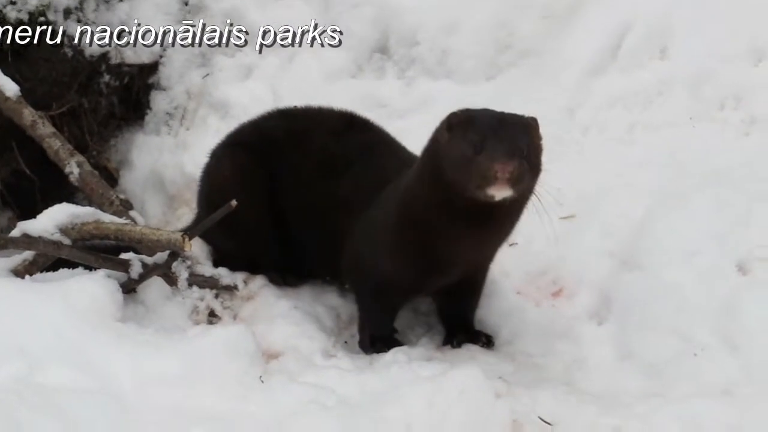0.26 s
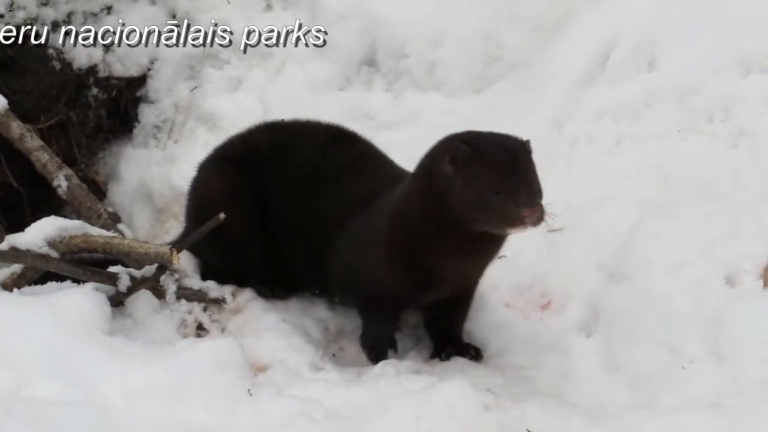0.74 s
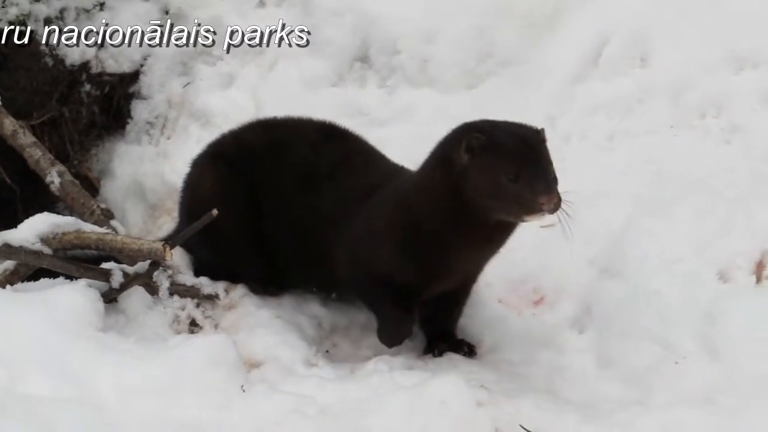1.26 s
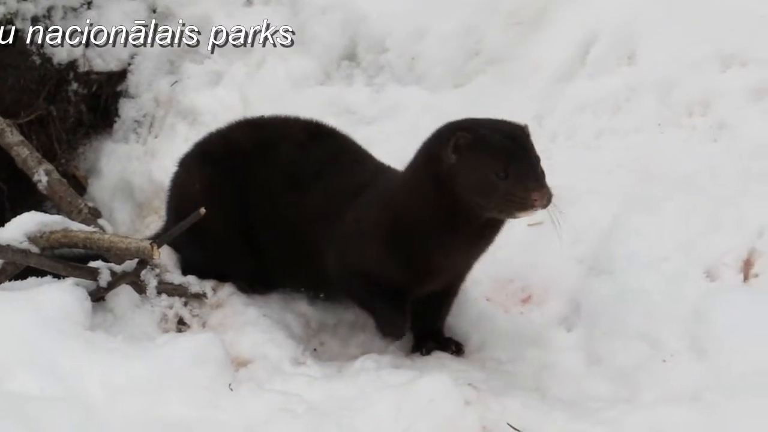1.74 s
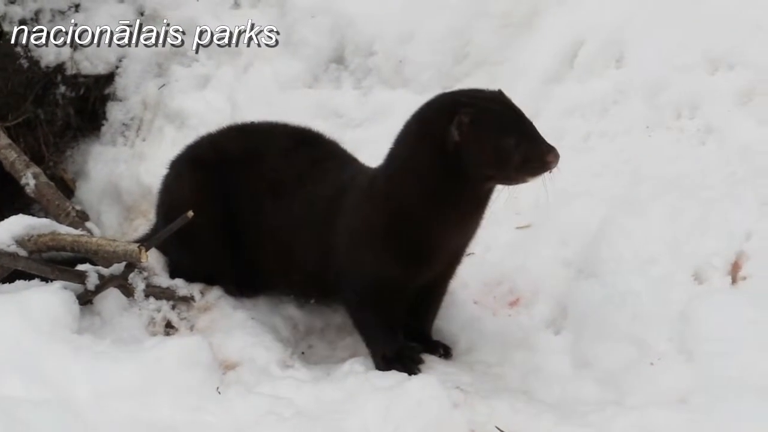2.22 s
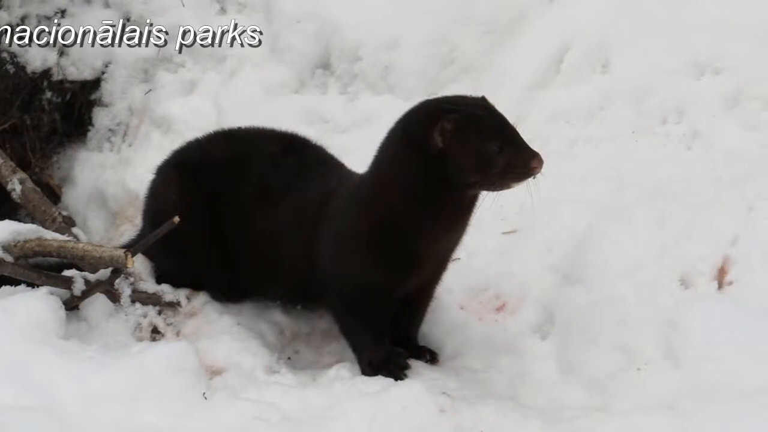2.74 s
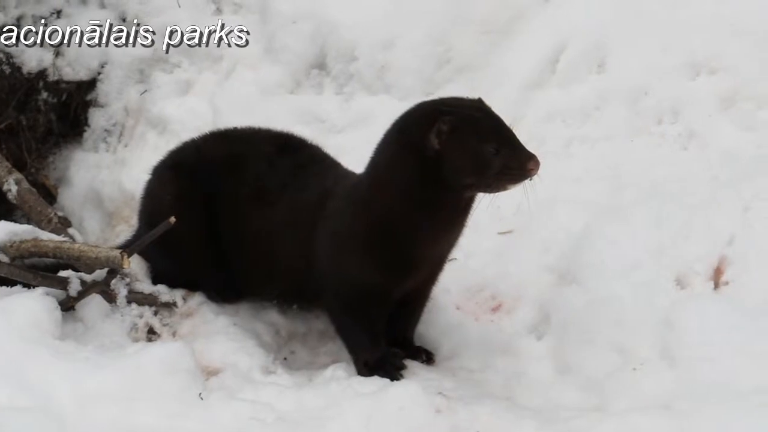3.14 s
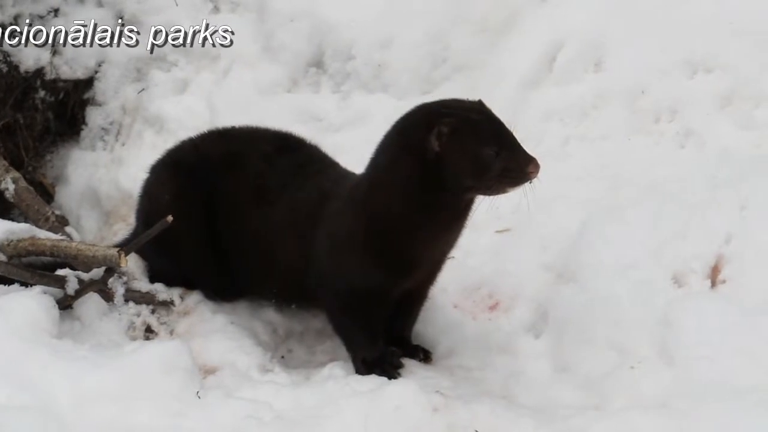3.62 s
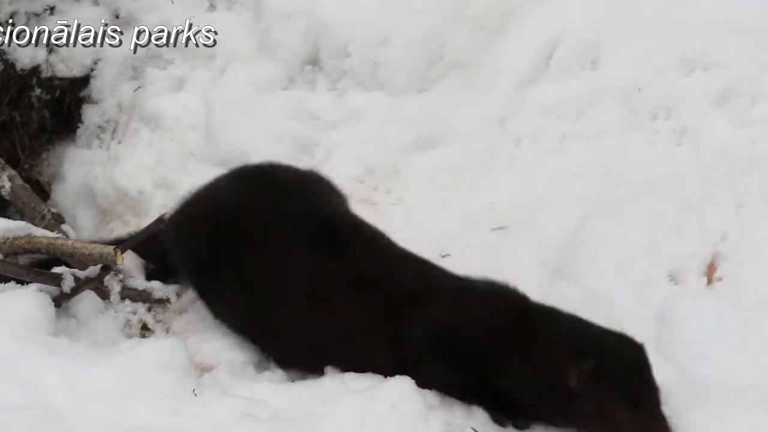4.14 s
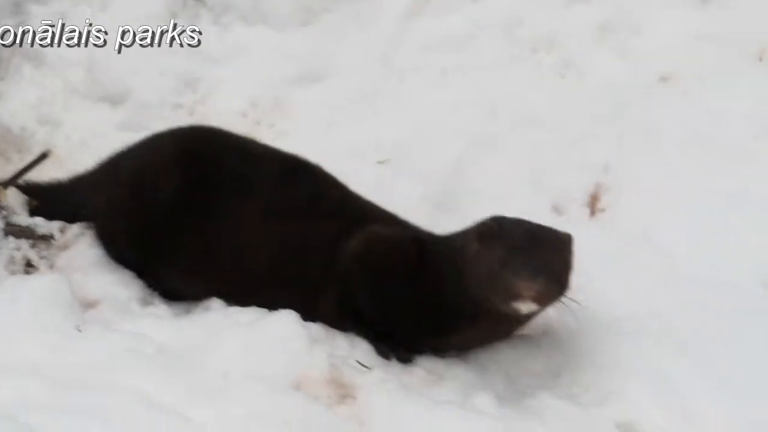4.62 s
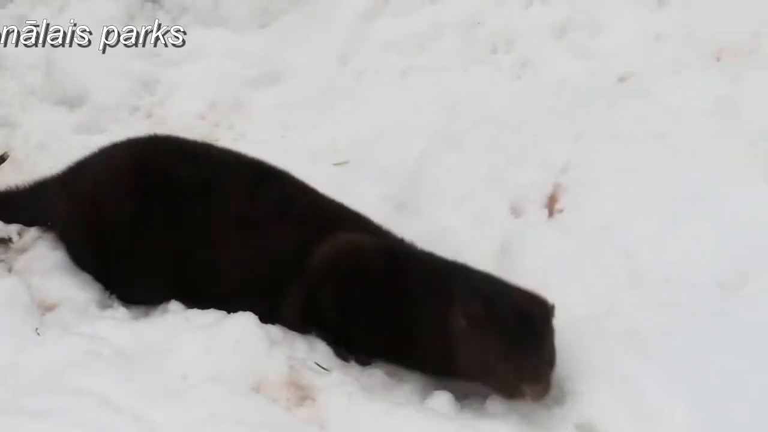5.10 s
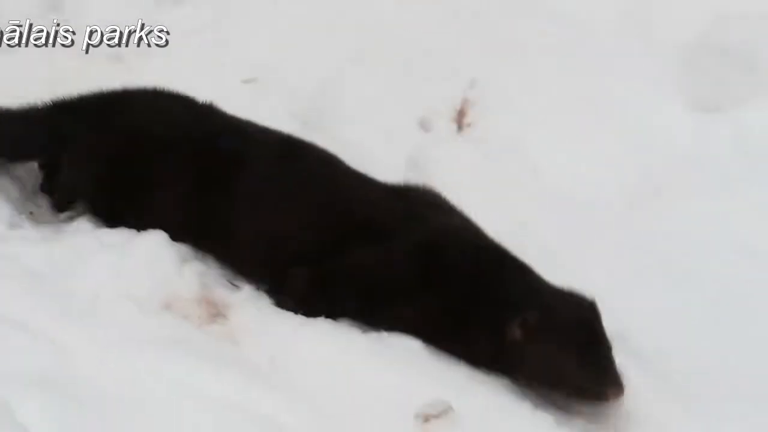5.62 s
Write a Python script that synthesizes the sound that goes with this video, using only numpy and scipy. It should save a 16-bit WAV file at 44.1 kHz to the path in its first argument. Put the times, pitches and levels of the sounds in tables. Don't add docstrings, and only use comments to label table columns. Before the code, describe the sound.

Quiet winter outdoors, hand-held microphones close to a small animal. Sparse dry clicks of breaking snow crust come first, the second snap strongest and toward the right. Then mostly hiss, low wind buffeting, faint ticks and distant high bird chirps. Near the end, three tight clusters of bright crackling crunches burst out, spread left and right, with grainy grinding and gentle brushing.

```python
import sys
import numpy as np
from scipy import signal
from scipy.io import wavfile

SR = 44100
rng = np.random.default_rng(int(sys.argv[2]) if len(sys.argv) > 2 else 0)


def gain_from_db(level_db):
    decades = np.asarray(level_db, float) / 20
    return 10 ** decades


def transcribe(signal):
    frames = np.atleast_2d(signal).T
    limited = np.clip(frames, -1, 1)
    pcm = np.round(limited * 32767).astype(np.int16)
    wavfile.write(sys.argv[1], SR, pcm)


N = 258426
CLICK_SAMPLES = 3500


def rms_one(x):
    return x / np.sqrt(np.mean(x ** 2) + 1e-20)


def in_time(rows):
    s, *columns = np.transpose(rows)
    return [np.interp(np.arange(N) / SR, s, c) for c in columns]


def at_hz(points, hz):
    points = np.array(points)
    return np.interp(np.log(hz), np.log(points[:, 0]), points[:, 1])


def drift(rate_hz, size=N):
    r = np.exp(-2 * np.pi * rate_hz / SR)
    noise = rng.standard_normal(size + SR)
    return rms_one(signal.lfilter([1], [1, -2 * r, r * r], noise)[SR:])


def ring(clicks, hz, t60_s):
    r, w = gain_from_db(-60 / (t60_s * SR)), 2 * np.pi * hz / SR
    return signal.lfilter([0, np.sin(w)], [1, -2 * r * np.cos(w), r * r], clicks + 1e-18)


def body(clicks, modes, tilts_db, scatter_db):
    chance = rng.standard_normal(len(modes))
    octaves = np.log2(np.array(modes)[:, 0] / 3000)
    bright_db, weight_db = tilts_db
    colour_db = np.where(octaves > 0, bright_db, -weight_db) * octaves + scatter_db * chance
    rings = 0
    for k, (hz, t60_s, db) in enumerate(modes):
        rings = rings + (-1) ** k * gain_from_db(db + colour_db[k]) * ring(clicks, hz, t60_s)
    snow = signal.butter(3, [213.6, 9600], "band", fs=SR, output="sos")
    return signal.sosfilt(snow, rings)


def crumble(decay_ms, per_s):
    t = np.arange(CLICK_SAMPLES) / SR
    sizes = gain_from_db(3.365 * np.minimum(rng.exponential(1, CLICK_SAMPLES), 4))
    sizes = sizes * rng.choice([-1, 1], CLICK_SAMPLES)
    struck = rng.random(CLICK_SAMPLES) < per_s / SR
    grains = sizes * struck * np.exp(-t * 1000 / max(decay_ms, .2))
    grains[0] = 2.36
    return grains


def add(out, sound, s, db, pan_db=0.):
    sound = sound / np.sqrt(np.sum(sound ** 2, axis=1, keepdims=True))
    sound = sound * gain_from_db([[pan_db / 2], [-pan_db / 2]])
    peak = np.sqrt(np.max(np.mean(sound ** 2, axis=0)))
    at = round(s * SR)
    out[:, at:at + CLICK_SAMPLES] += gain_from_db(db) * (sound / peak)[:, :N - at]


# f/Hz, t60/s, snap level/dB, crunch level/dB
LEFT_MODES = [(318, 0.00555, -63, -15), (605, 0.031, -23, -17.5), (1039, 0.0114, -45.5, -16),
              (1274, 0.021, -9.5, -13.5), (1748, 0.0235, -16.5, -15.5), (2162, 0.0207, -13, -9.5),
              (2528, 0.0106, -5.5, -6), (3157, 0.0109, -6, -2), (3479, 0.00456, -18.5, 4),
              (4001, 0.00433, -6, -1), (4545, 0.00388, -17, 1.5), (5300, 0.00352, -56, -8),
              (5480, 0.0056, -35, -30), (6200, 0.0057, -36.5, -57), (8040, 0.0042, -35.5, -56)]
# f/Hz, t60/s, snap level/dB, crunch level/dB
RIGHT_MODES = [(349, 0.00607, -36, -12), (605.6, 0.0445, -24, -19.5), (966.6, 0.0225, -12, -8.5),
               (1326.4, 0.00903, -3.5, -4.5), (1965, 0.0195, -13.5, -13), (2409, 0.021, -8, -16),
               (2917.6, 0.00928, -2.5, -1), (3382, 0.0088, -3.5, -16.5), (4074, 0.00316, 1.5, -2),
               (4663, 0.00427, 2, -4.5), (5317, 0.00486, -2, -6), (5834, 0.0048, 0, -3),
               (6800, 0.00198, -1, -1), (8196, 0.00352, -15, -6.5), (8985, 0.00201, -19, -10)]
# t/s, peak/dB, left-right/dB, brightness/(dB/octave), weight/(dB/octave)
SNAPS = [
    (0.5202, -19, -6, 5.5, 0.5),
    (1.827, -11.5, -6.5, -2.5, -3.5),
    (4.5283, -25.5, -2, -4, 1),
    (5.3424, -12, -8.5, -1.5, -4),
    (5.5507, -20.5, -6, 2, 2),
    (5.597, -12.5, -8, -3.5, -2.5),
]


def snaps():
    out, ms = np.zeros((2, N)), SR / 1000
    left, right = np.array(LEFT_MODES)[:, [0, 1, 2]], np.array(RIGHT_MODES)[:, [0, 1, 2]]
    paths = np.zeros(round(4 * ms))
    paths[np.round(np.array([.2, .55, .85, 2.6]) * ms).astype(int)] = [1.0, 0.48, 0.626, 0.069]
    breaks_at = np.round(np.array([0, .14, .62]) * ms).astype(int)
    for s, db, pan_db, *tilts_db in SNAPS:
        near = np.zeros(CLICK_SAMPLES)
        near[breaks_at] = [-.4, 1, .4] * gain_from_db(rng.normal(0, 0.46, 3))
        far = np.convolve(near, paths)[:CLICK_SAMPLES] + gain_from_db(-22) * crumble(3.37, per_s=10000)
        near = near + gain_from_db(-20) * crumble(1.0, per_s=8000)
        sides = [body(far, left, tilts_db, scatter_db=0.0), body(near, right, tilts_db, scatter_db=1.5)]
        add(out, np.array(sides), s - .0003, db + 3.5, pan_db)
    no_thud = signal.butter(2, 432, "high", fs=SR, output="sos")
    return signal.sosfilt(no_thud, out)


# t/s, peak/dB, left-right/dB, brightness/(dB/octave), weight/(dB/octave)
CRUNCHES = [(1.221, -28.5, 1.5, 7.5, 3.5), (4.399, -35, -12.5, 5.5, 4), (4.402, -17, 10, 7, -8.5),
            (4.437, -17.5, 5, 12.5, 2.5), (4.4539, -30, -20.5, 5.5, -4), (4.495, -36, 4.5, -7.5, 7),
            (4.562, -27.5, -6, -4.5, 0.5), (4.5757, -28, 8, -2, -0.42), (4.582, -16.5, 2, 7.5, 0.5),
            (4.59, -26, -15, 3.5, -0.5), (4.602, -36, -2.5, 7, 6.5), (4.65, -15.5, 6, 5, 0),
            (5.3326, -25, 2.5, -2, -0.2), (5.367, -20.5, 1.5, 5, -0.02), (5.384, -28, -1, -9, 0.5),
            (5.584, -24.5, 3, -2, 3), (5.589, -30, -6, -2.5, -2), (5.6075, -13.5, 1.5, 2.5, -1.03),
            (5.613, -25.5, 0.5, -1.5, 2.5), (5.78, -37.5, -0.5, -8.5, 4.5), (5.789, -17.5, 0.5, 4, -0.5),
            (5.796, -28, 12.5, -5.5, 3.5), (5.8, -28, -1.5, 1.5, -2.5)]


def crunches():
    out, crumble_ms = np.zeros((2, N)), 1.404
    left, right = np.array(LEFT_MODES)[:, [0, 1, 3]], np.array(RIGHT_MODES)[:, [0, 1, 3]]
    for s, db, pan_db, *tilts_db in CRUNCHES:
        near = crumble(crumble_ms, per_s=3000)
        other = crumble(0.86 * crumble_ms, per_s=4100)
        far = np.r_[np.zeros(8), near + .7 * other][:CLICK_SAMPLES]
        sides = [body(near, left, tilts_db, scatter_db=1.5), body(far, right, tilts_db, scatter_db=0.0)]
        add(out, np.array(sides), s + 0.00074, db - 5.0, pan_db)
    return out


# t/s, peak/dB, left-right/dB, brightness/(dB/octave), weight/(dB/octave)
CRACKS = [(.5224, -32.5, 7.5, 6, 0), (4.4002, -35, 6, 6.5, 5.5), (4.4357, -40, 10, -0.5, 6),
          (4.441, -32, 5, 2.5, 1), (4.4452, -40.5, 5.5, -2.5, -3.5), (4.4522, -41.5, 0, 2.5, -4.5),
          (4.4554, -33.5, -19, 4.5, 0.5), (4.5639, -34, -14, 0.5, 3), (4.5763, -28, 10, -3, 2),
          (4.5852, -30, -1, -3.5, 2), (4.6533, -31, 2.5, -2, 0), (4.656, -44.5, 10, -2.5, -1.5),
          (5.3335, -25, -0.5, 0.5, -1), (5.3475, -34.5, 6, -2, 0), (5.3679, -25.5, 5, 5, 0),
          (5.374, -36, 9.5, -1, 2.5), (5.5526, -39, -0.5, -3, 2), (5.584, -37, 5, 0, 4),
          (5.5965, -33, -6, -3.5, 1), (5.6102, -29, 6, 2, 0), (5.6113, -31.5, 6, 4, 0),
          (5.6124, -32.5, 7.5, 0, 5), (5.6173, -36, 10.5, -2.5, 3.5), (5.7874, -35, 3, -4, 0),
          (5.7898, -24.5, 5, 2.5, -1), (5.7921, -26, -1, 2.5, 1), (5.793, -34, 0.5, 0, -3),
          (5.7958, -36, 6, 0, -3), (5.801, -25.5, -5, -0.5, -4)]


def cracks():
    out = np.zeros((2, N))
    left, right = np.array(LEFT_MODES)[:, [0, 1, 3]], np.array(RIGHT_MODES)[:, [0, 1, 3]]
    click = np.eye(1, CLICK_SAMPLES)[0]
    late = np.roll(click, 4)
    for s, db, pan_db, *tilts_db in CRACKS:
        sides = [body(click, left, tilts_db, scatter_db=2.0), body(late, right, tilts_db, scatter_db=3.5)]
        add(out, np.array(sides), s - .0003, db - 0.5, pan_db)
    return out


# t/s, f/Hz, peak/dB, t60/s
KNOCKS = [(.5203, 1200, -33, 0.0091), (.5204, 1400, -44.5, 0.0062), (.521, 3600, -31, 0.0071),
          (1.8272, 1946, -28.5, 0.0143), (1.8272, 5680, -26.5, 0.0046), (1.222, 3980, -42.5, 0.0062),
          (.5204, 7240, -33, 0.0054), (.5204, 930, -44.5, 0.0085), (1.8272, 898, -38, 0.0103),
          (4.5288, 4350, -34, 0.0052), (4.5638, 2920, -39.5, 0.0066), (5.3336, 7360, -37.5, .004),
          (5.7898, 4600, -26, 0.0067), (4.4556, 6100, -37.5, .006), (4.4025, 990, -40, 0.0128),
          (4.439, 684, -49.5, 0.0185), (5.792, 2050, -35.5, 0.0104), (0.5211, 2570, -32.5, 0.0175),
          (0.522, 3180, -37.5, 0.009), (1.2225, 960, -46, 0.0266), (1.8285, 635, -43, 0.037),
          (3.03, 2180, -52, 0.0084), (4.6512, 423, -56, 0.0194)]


def knocks():
    out = np.zeros((2, N))
    bump = np.r_[np.hanning(18), np.zeros(CLICK_SAMPLES - 17)]
    push = np.diff(bump, 2, prepend=0)
    for s, hz, db, t60_s in KNOCKS:
        knock = ring(push, hz, t60_s)
        add(out, np.array([knock, knock]), s, db, pan_db=1.0)
    return out


# t/s, length/s, peak/dB, left-right/dB, brightness/(dB/octave)
GRINDS = [(1.227, 0.0081, -47, 0.5, -8.5), (4.407, 0.0117, -47.5, 2.5, 0), (4.443, 0.021, -40, -6, 3.5),
          (4.59, 0.033, -41, -2, 1.5), (4.6511, 0.0162, -39.5, -7, -1), (5.342, 0.0128, -35.5, 3, -19.5),
          (5.3685, 0.0436, -45, 4.5, -19.5), (5.583, 0.0672, -39, -3.5, 3), (5.7847, 0.031, -40, -3, -3.5)]


def grinds():
    out, weight_db = np.zeros((2, N)), 4
    t = np.arange(CLICK_SAMPLES) / SR
    for s, length_s, db, pan_db, bright_db in GRINDS:
        swell = np.sin(np.pi * np.clip(t / length_s, 0, 1) ** 0.688)
        sides = []
        for modes in (LEFT_MODES, RIGHT_MODES):
            grains = swell * crumble(60, per_s=5000)
            sides.append(body(grains, np.array(modes)[:, [0, 1, 3]], [bright_db, weight_db], scatter_db=3.5))
        add(out, np.array(sides), s, db, pan_db)
    return out


# f/Hz, t60/s, level/dB
TICK_MODES = [(341.5, 0.0238, -7.5), (650.5, 0.0354, -1), (1021, 0.0238, 2), (1434, 0.007, 3.5),
              (1998, 0.018, -2), (2862, 0.011, 0), (3886, 0.0063, -4.5)]
# t/s, peak/dB, tilt/(dB/octave)
TICKS = [(0.104, -43.5, 1.5), (1.374, -43.5, 1.5), (1.742, -44, 2), (2.069, -51, -3.5), (2.663, -43.5, 0),
         (3.029, -44.5, -1.5), (3.483, -43, 0), (3.61, -43, -4), (4.215, -44.5, -1.35), (4.788, -52, 1.5),
         (4.844, -57.5, -2.24), (4.948, -46, -16.5), (4.998, -45.5, -2.5), (5.158, -47.5, 0),
         (5.181, -48.5, 1.4), (5.204, -49, 3), (5.245, -50, -2.5), (5.42, -44, 0.56), (5.466, -45, -1),
         (5.496, -41.5, -2.5), (5.65, -43.5, -7)]


def ticks():
    out = np.zeros((2, N))
    for s, db, tilt_db in TICKS:
        tick = body(crumble(1.0, per_s=4700), TICK_MODES, [tilt_db, -tilt_db], scatter_db=0.5)
        add(out, np.array([tick, tick]), s, db - 3.0)
    return out


# t/s, level/dB
BRUSH = [(0.0, -69.5), (3.57, -67.5), (4.32, -64), (4.47, -63.5), (5.19, -64), (5.37, -61.5), (5.52, -60.5),
         (5.63, -61.5), (5.86, -61)]
# f/Hz, width/Hz, level/dB
BRUSH_MODES = [(411, 132, -6), (641.6, 98, -1.5), (896.2, 86, 0), (1176, 97.5, 1)]


def brushing():
    brush_db, = in_time(BRUSH)
    grains = rng.standard_normal((2, N)) * gain_from_db(2.25 * drift(69))
    grains[1] = .5 * grains[0] + 1.435 * grains[1]
    hollow = 0
    for k, (hz, width_hz, db) in enumerate(BRUSH_MODES):
        hollow = hollow + (-1) ** k * gain_from_db(db) * rms_one(ring(grains, hz, 2.37 / width_hz))
    return gain_from_db(brush_db - 3) * rms_one(hollow)


def whistle(hz, level, rough):
    size = len(hz)
    wobbled_hz = hz * (1 + 0.011 * rough * drift(150, size=size))
    phase = 2 * np.pi * np.cumsum(wobbled_hz) / SR
    flutter = np.array([rms_one(gain_from_db(9.4 * rough * drift(70, size=size))) for side in "LR"])
    return np.sqrt(2) * level * flutter * np.sin(phase + rng.uniform(0, 1.0, (2, 1)))


# delay/s, level/dB
FOLIAGE = [(.013, -7.5), (.024, -9.5), (.037, -10.5)]
# t/s, length/s, start f/Hz, rise/Hz, level/dB
SEEPS = [
    (1.997, .125, 7470, 320.6, -63.5),
    (3.472, .14, 7566, 349, -60.5),
]


def seeps():
    out, arch, edge_s, pan_db = np.zeros((2, N)), 0.9, 0.0073, -9
    for s, length_s, start_hz, rise_hz, db in SEEPS:
        u = np.linspace(0, 1, round(length_s * SR))
        fade = np.clip(np.minimum(u, 1 - u) * length_s / edge_s, 0, 1)
        hz = start_hz + rise_hz * np.sin(np.pi * arch * u ** 1.45)
        note = whistle(hz, gain_from_db(db) * fade, rough=0.33)
        for lag_s, echo_db in [(0.0021, 0)] + FOLIAGE:
            at = round((s + lag_s) * SR)
            out[:, at:at + len(u)] += gain_from_db(echo_db) * note
    return out * gain_from_db([[pan_db / 2], [-pan_db / 2]])


# t/s, length/s, start f/Hz, end f/Hz, level/dB
CHIPS = [(0.038, 0.049, 7200, 7300, -72.5), (.24, 0.045, 6700, 6750, -76.5),
         (1.41, 0.022, 6500, 6900, -67.5), (1.897, .045, 6750, 6800, -70.5),
         (2.263, 0.049, 6800, 6800, -65.5), (2.316, 0.034, 6850, 6940, -73),
         (2.556, 0.055, 6750, 6885, -67.5), (2.818, 0.049, 6800, 6800, -72), (3.503, .012, 6000, 6500, -68),
         (3.517, .028, 6550, 6700, -71.5), (4.155, .016, 5300, 6740, -68), (4.309, 0.021, 6420, 6800, -63),
         (4.734, 0.018, 5420, 6690, -65), (5.142, 0.034, 6700, 7370, -65.5),
         (5.496, 0.037, 6950, 6900, -71.5), (5.752, 0.026, 7000, 7000, -70), (5.799, 0.04, 8120, 7970, -65)]


def chips():
    out, clean_s, rough_per_s, roughest = np.zeros((2, N)), .012, 17, 0.45
    for s, length_s, start_hz, end_hz, db in CHIPS:
        u = np.linspace(0, 1, round(length_s * SR))
        hz = end_hz + (start_hz - end_hz) * (1 - u) ** 2
        rough = np.clip(rough_per_s * (length_s - clean_s), 0, roughest)
        at = round(s * SR)
        out[:, at:at + len(u)] += whistle(hz, gain_from_db(db) * np.sin(np.pi * u) ** 0.225, rough)
    return out


def bank(spectrum, alike, low_hz, octaves, patchy_db, patch_rate_hz):
    out, edges_hz = 0, low_hz * 2 ** np.arange(0, octaves, 1 / 3)
    white = rng.standard_normal((2, 2, N + 8000))
    flicker = drift(patch_rate_hz)
    for k, (low, high) in enumerate(zip(edges_hz, edges_hz[1:])):
        band = signal.butter(2, [low, high], "band", fs=SR, output="sos")
        mid, side = signal.sosfilt(band, white[k % 2])[:, 8000:]
        hz = np.sqrt(low * high)
        c = np.clip(alike(hz), -1, 1)
        stereo = np.sqrt(1 + c) * mid + np.sqrt(1 - c) * side * [[1], [-1]]
        out = out + gain_from_db(at_hz(spectrum, hz)) * stereo
    return rms_one(out * gain_from_db(patchy_db * flicker))


# f/Hz, level/(dB per Hz)
GUST_SPECTRUM = [(18, -9.5), (30, -1.5), (55, 3), (80, -6.5), (120, -13.5), (180, -18), (300, -42)]
# f/Hz, level/(dB per Hz)
ROAR_SPECTRUM = [(30, -4), (48, -3), (65, 4), (85, 0.5), (105, -1.5), (140, -13.5), (200, -20)]
# middle t/s, length/s, left level/dB, right level/dB
GUSTS = [(0.876, 0.22, -61, -66.5), (1.159, 0.108, -59, -64.5), (1.418, 0.1498, -48, -56),
         (1.611, 0.112, -54, -60.5), (1.796, 0.14, -54.5, -66), (1.845, 0.051, -71, -55.5),
         (2.836, 0.098, -59, -78.5), (2.995, 0.135, -65, -69), (3.329, 0.19, -65, -66),
         (3.158, 0.097, -54, -54), (3.521, 0.215, -55, -56.5), (3.679, 0.0315, -41.5, -60),
         (3.812, 0.112, -56.5, -59.5), (3.91, 0.0395, -71, -56), (4.439, 0.1, -52, -58),
         (4.531, 0.127, -54.5, -50.5), (4.665, 0.222, -55, -62), (4.883, 0.174, -47.5, -53),
         (4.999, 0.166, -45.5, -42), (5.07, 0.072, -63.5, -51.5), (5.169, 0.144, -56, -54),
         (5.28, 0.048, -53, -61.5), (5.519, 0.283, -55, -58.5), (5.79, 0.075, -59.5, -61.5)]


def wind():
    t = np.arange(0, N / SR + .01, .002)
    power = gain_from_db(-80.5) ** 2
    for s, length_s, left_db, right_db in GUSTS:
        bell = np.exp(-(2.93 * (t - s) / length_s) ** 2)
        power = power + gain_from_db([[left_db], [right_db]]) ** 2 * bell
    strength = in_time(np.c_[t, np.sqrt(power).T])
    lumps = bank(GUST_SPECTRUM, lambda hz: .15, 15.97, 4.5, patchy_db=2.0, patch_rate_hz=23.6)
    roar = bank(ROAR_SPECTRUM, lambda hz: .8, 24.96, 3.4, patchy_db=3.0, patch_rate_hz=1.48)
    return strength * lumps + gain_from_db(-68.5) * roar


# f/Hz, level/(dB per Hz)
HISS_SPECTRUM = [(76, -6.5), (130, -6), (215, -7.5), (349, -6.5), (453, -4), (554, -8), (678, -4.5),
                 (974, -9.5), (1170, -6), (1750, -8.5), (2950, -8), (3330, -9), (8570, -15), (15100, -22.5),
                 (16000, -30)]
# f/Hz, correlation/1
LIKENESS = [(60, 1), (180, 0.66), (550, 0.518), (1650, 0.059), (4970, 0.112), (15000, 0.033)]
# f/Hz, rms level/dB
WHINES = [(8799, -84.5), (13722, -99)]


def hiss():
    t = np.arange(N) / SR
    noise = bank(HISS_SPECTRUM, lambda hz: at_hz(LIKENESS, hz), 99.67, 7.6, patchy_db=0, patch_rate_hz=1)
    whines = 0
    for hz, db in WHINES:
        whines = whines + np.sqrt(2) * gain_from_db(db) * np.sin(2 * np.pi * hz * t + 0.47 * drift(4))
    return gain_from_db(-60.5) * noise + whines


def scene():
    crust = snaps() + crunches() + cracks() + knocks() + grinds()
    return crust + ticks() + brushing() + seeps() + chips() + wind() + hiss()


def low_pass(x):
    return signal.sosfilt(signal.butter(12, 16430, fs=SR, output="sos"), x)


def record(dry):
    top_cut = signal.cheby2(16, 60, 16150, fs=SR, output="sos")
    mix = signal.sosfilt(top_cut, dry)
    return low_pass(mix)


dry = scene()
out = record(dry)
transcribe(out)
```